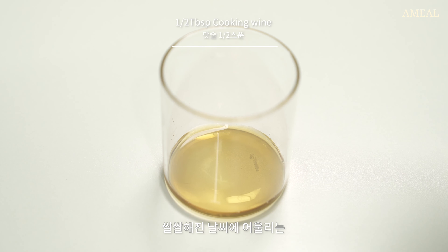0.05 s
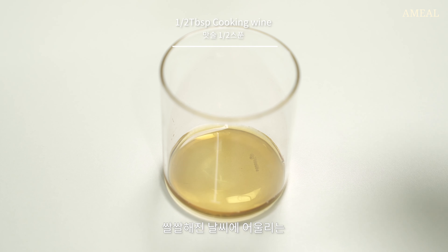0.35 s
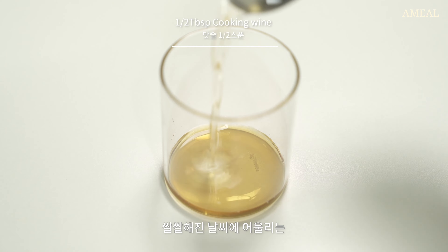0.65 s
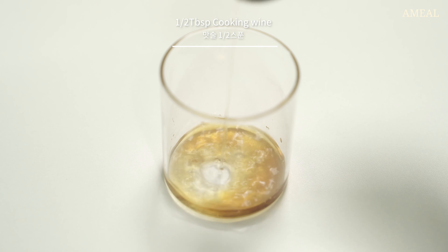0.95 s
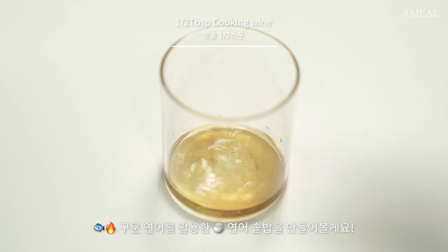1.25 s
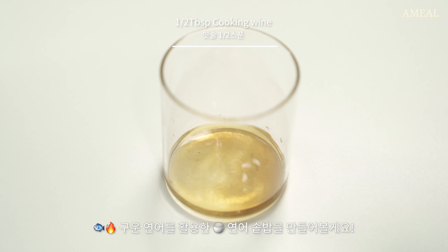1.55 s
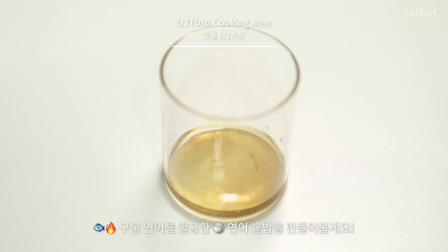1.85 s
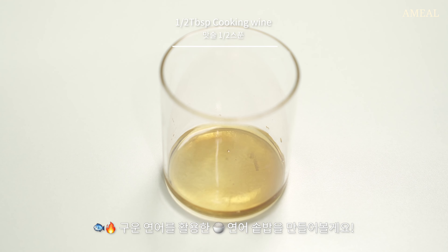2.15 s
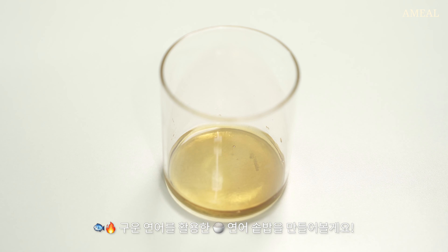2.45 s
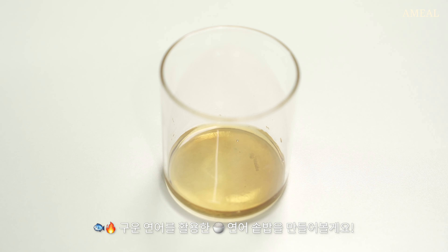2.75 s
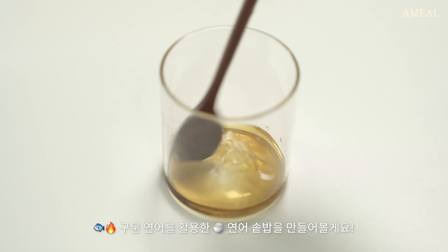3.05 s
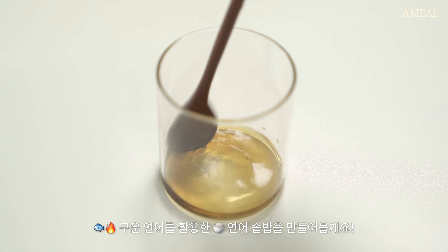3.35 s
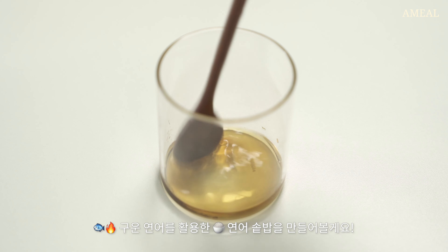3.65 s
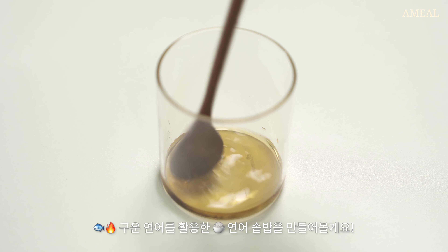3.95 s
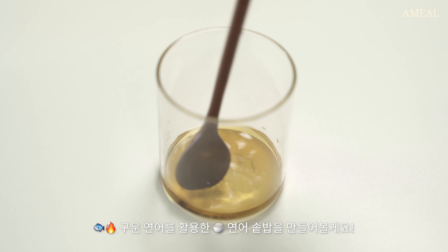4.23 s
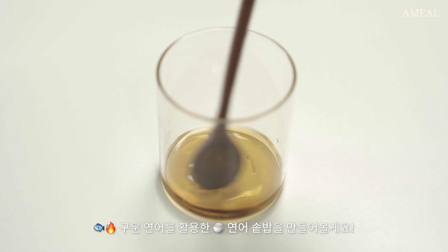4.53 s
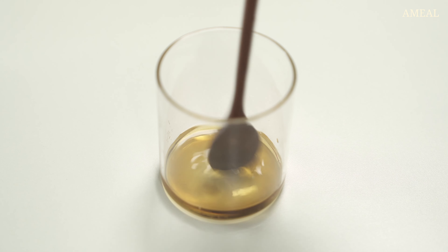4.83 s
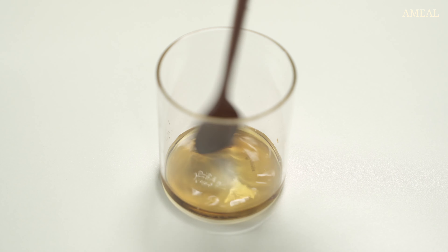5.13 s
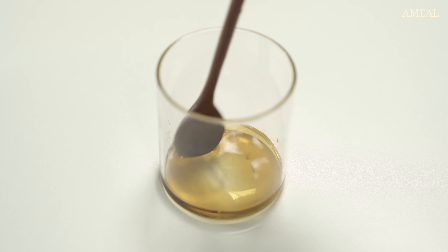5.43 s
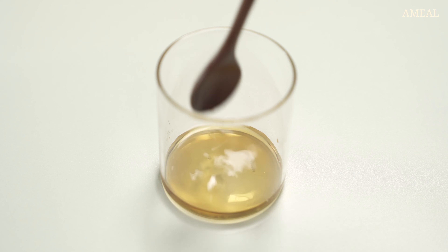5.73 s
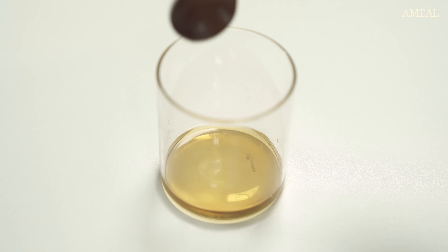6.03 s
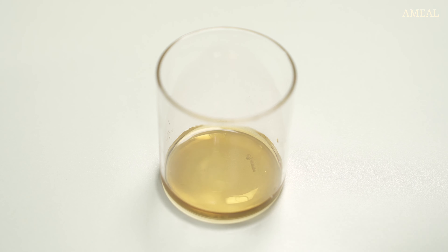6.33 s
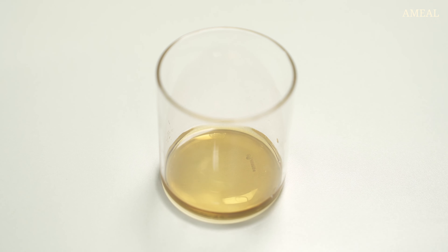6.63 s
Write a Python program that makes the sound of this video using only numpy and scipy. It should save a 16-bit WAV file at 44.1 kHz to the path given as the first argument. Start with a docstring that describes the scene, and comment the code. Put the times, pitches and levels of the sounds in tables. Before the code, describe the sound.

A little liquid drops into a small glass tumbler with a few quick, high plinks. After a pause, a wooden spoon taps in and stirs, clinking brightly on the wall three times and knocking unevenly on the bottom, thudding through the table. It taps lightly on the way out and a sleeve swishes softly. The sounds are close, in a small, hard kitchen with a brief echo and faint hiss.

```python
"""At a kitchen table, a splash of liquid is poured into a small glass tumbler and a few bubbles plink.
A wooden spoon goes in with a light tap and stirs: it clinks on the wall, making the glass ring, and
knocks on the bottom, which thuds through the table. It taps again as it comes out, and a sleeve swishes
as the arm draws back. The small, hard room echoes briefly over a faint, steady hiss."""
import sys
import numpy as np
from scipy import signal
from scipy.fft import rfft, irfft, next_fast_len
from scipy.io import wavfile
from scipy.ndimage import uniform_filter1d

SR = 44100
rng = np.random.default_rng(int(sys.argv[2]) if len(sys.argv) > 2 else 0)


def master_out(mix):
    """Clip the mix to full scale and print it as 16-bit PCM to the path in sys.argv[1]."""
    frames = np.transpose(np.atleast_2d(mix))
    ceiling = np.clip(frames, -1, 1)
    pcm = np.round(ceiling * 32767).astype(np.int16)
    wavfile.write(sys.argv[1], SR, pcm)


N = 299189
T = np.arange(SR) / SR  # one second: the life of a single hit


def amp(db):
    """Turn decibels into a number to multiply by."""
    return 10 ** (np.asarray(db) / 20)


def fade(fade_s):
    """A dying-away curve. Throughout, fade_s is the time taken to fall by 60 dB."""
    return amp(-60 * T / fade_s)


def unit(x):
    """Scale a sound to an average (rms) strength of 1."""
    return x / np.sqrt(np.mean(x ** 2) + 1e-20)


def along(points, hz):
    """Read between rows of (pitch_hz, value), with octaves evenly spaced."""
    pitches, values = np.transpose(points)
    return np.interp(np.log(hz + 1), np.log(pitches + 1), values)


def panned(x, pan_db):
    """Make a sound stereo; pan_db is how much louder the left is than the right."""
    return x * amp([[pan_db / 2], [-pan_db / 2]])


def add(track, start_s, x):
    """Mix a sound into the track at start_s."""
    start = round(start_s * SR)
    track[:, start:start + x.shape[-1]] += x[..., :N - start]


def filtered(x, gain):
    """Turn each pitch up or down by gain(hz)."""
    size = x.shape[-1]
    padded = next_fast_len(size + SR // 4)
    hz = np.fft.rfftfreq(padded, 1 / SR)
    return irfft(rfft(x, padded) * gain(hz), padded)[..., :size]


def noise(gain, likeness, size):
    """Stereo noise shaped by gain(hz). Likeness 1 is the same in both ears, 0 unrelated, -1 opposite."""
    def shares(hz):
        angle = np.arccos(np.clip(along(likeness, hz), -1, 1)) / 2
        return gain(hz) * np.array([np.cos(angle), np.sin(angle)])
    mid, side = filtered(rng.standard_normal((2, size)), shares)
    return unit(np.array([mid + side, mid - side]))


def push(tone, tilt_db):
    """One pulse of peak 1 with the given tone; tilt_db adds treble, in dB per octave."""
    hz = np.fft.rfftfreq(len(T), 1 / SR)
    level_db = along(tone, hz) + tilt_db * np.log2(1 + hz / 1000)
    cepstrum = irfft(np.log(amp(level_db)))
    cepstrum[1:] *= 2 * (T[1:] < .5)  # packs the energy at the start, as in a real hit
    pulse = irfft(np.exp(rfft(cepstrum)))
    return pulse / np.abs(pulse).max()


def ring(notes, attack_s, scatter_db, ratio=1, tilt_db=0):
    """A struck object's fading notes, one a row; scatter_db varies their strengths at random."""
    hz, db, fade_s = np.transpose(notes)[:3, :, None]
    db = db + tilt_db * np.log2(np.maximum(hz / 3300, 1))
    db = db + scatter_db * rng.standard_normal(hz.shape)
    phase = 2 * np.pi * (hz * ratio * T + rng.random(hz.shape))
    return amp(db) * fade(fade_s) * np.sin(phase) * (1 - np.exp(-T / attack_s))


def crack(fade_s, low_hz, high_hz):
    """A short burst of noise between two pitches."""
    band = signal.butter(2, [low_hz, min(high_hz, SR / 2 - 1000)], "band", fs=SR)
    return unit(signal.lfilter(*band, rng.standard_normal(len(T)))) * fade(fade_s)


# how long the room echoes: pitch_hz, fade_s
ECHO_FADE = [(200, 0.37), (600, 0.44), (1400, 0.52), (2800, 0.42), (8000, 0.49), (15000, 0.32)]
# how alike the echo is in both ears: pitch_hz, likeness
ECHO_LIKENESS = [(200, 0.96), (800, 0.6), (2000, 0.16), (5000, 0.055)]
def in_room(x, echo_db):
    """The direct sound plus a wash of echoes that builds up as the walls answer."""
    size = SR // 2
    hz, t, bands = signal.stft(noise(np.ones_like, ECHO_LIKENESS, size), SR, nperseg=256)
    bands *= amp(-60 * t / along(ECHO_FADE, hz)[:, None])
    tail = signal.istft(bands, SR, nperseg=256)[1][:, :size]
    tail *= 1 - np.exp(-(T[:size] / 0.0031) ** 2)
    tail /= np.linalg.norm(tail[0])
    x = np.atleast_2d(x)
    return x + amp(echo_db) * signal.fftconvolve(x, tail, axes=1)[:, :len(T)]


# the tone of the hiss: pitch_hz, level_db
HISS_TONE = [(15, -60), (25, -23), (49, -15), (87, -23.5), (170, -9), (354, -2.5), (384, -4), (607, -2.5),
             (677, -1.5), (2000, -5.5), (5000, -13.5), (5570, -6), (6380, -17), (7710, -19), (16000, -30)]
# how alike the hiss is in both ears: pitch_hz, likeness
HISS_LIKENESS = [(60, 0.7), (180, 1), (550, -0.25), (1650, -0.18), (4970, -0.27), (15000, 0.00094)]
# narrow, whining bands in the hiss: pitch_hz, width_hz, level_db
WHINE_BANDS = [(5690, 68, 4), (7620, 190, -6), (8240, 160, -7)]
def room_hiss():
    """A steady hiss with a thin, noisy whine in it."""
    def peaks(hz):
        return sum(amp(db) / (1 + (2 * (hz - centre) / width) ** 2) for centre, width, db in WHINE_BANDS)
    hiss = noise(lambda hz: amp(along(HISS_TONE, hz)), HISS_LIKENESS, size=N)
    whine = noise(peaks, likeness=[(6000, 0.17)], size=N)
    return amp(-55.5) * hiss + amp(-70.5) * whine


def plink(db, hz, fade_s):
    """One briefly ringing note."""
    return amp(db) * fade(fade_s) * np.sin(2 * np.pi * hz * T) * (1 - np.exp(-T / 0.0003))


# drops falling into the liquid: start_s, low_note_db, high_notes_db
FALLING_DROPS = [(0.813, -37, -19.5), (0.976, -48.5, -62), (1.041, -42.5, -62), (1.079, -42, -55),
                 (1.096, -44, -62), (1.112, -44, -62), (1.127, -39, -62), (1.138, -25, -24.5)]
# droplets that spatter: start_s, pitch_hz, level_db
DROPLETS = [(.802, 13100, -49.5), (.863, 9040, -52.5), (1.078, 9500, -49), (1.08, 7040, -60),
            (1.095, 10150, -49), (1.139, 7070, -47.5), (1.17, 14000, -54)]
def pour():
    """Each drop rings the bubbly liquid and the glass; droplets splat, each with a tiny bubble."""
    out = np.zeros((2, N))
    first_hz, sink_hz_per_s = 2730, 1310  # the pitch sinks as the liquid fills with bubbles
    high_ratios = 1.66 * (1 + 0.06 * np.array([-0.8, -0.4, 0.12, 0.42, 0.67]))
    for start_s, low_db, high_db in FALLING_DROPS:
        hz = first_hz - sink_hz_per_s * (start_s - FALLING_DROPS[0][0])
        low = plink(low_db, hz, fade_s=0.062)
        high = np.mean([plink(high_db, hz * ratio, fade_s=0.026) for ratio in high_ratios], axis=0)
        wall_db = -27.5 + 1.94 * (low_db + 25)  # loud drops ring the glass far more
        wall = plink(wall_db, hz=3506, fade_s=0.085)
        add(out, start_s, in_room(low, echo_db=-6) + in_room(high, echo_db=-1.5))
        add(out, start_s, in_room(wall, echo_db=-3))
    for start_s, hz, db in DROPLETS:
        splat = amp(db) * crack(fade_s=0.022, low_hz=0.48 * hz, high_hz=1.2 * hz)
        bubble = plink(db - 2.5, hz, fade_s=0.043)
        add(out, start_s, in_room(splat + bubble, echo_db=-0.2))
    return out


# taps as the spoon goes in and comes out: start_s, level_db
SPOON_TAPS = [(2.984, -28), (5.478, -34), (5.517, -29.5), (5.583, -29.5), (5.608, -28.5)]
# the tone of a tap: pitch_hz, level_db
TAP_TONE = [(100, -27), (450, 5.5), (1300, 9), (2200, 4.5), (3500, -9.5), (7000, -28), (15000, -46)]
def spoon_taps():
    """Light, dry taps on the right: each is a sharp touch with a short, noisy tail."""
    out = np.zeros((2, N))
    for start_s, db in SPOON_TAPS:
        contact = amp(-17) * rng.standard_normal(len(T)) * fade(0.0096)
        contact[0] = 1  # the touch itself
        tap = signal.fftconvolve(contact, push(TAP_TONE, tilt_db=0))[:len(T)]
        tap *= amp(db) / np.abs(tap).max()
        add(out, start_s, in_room(panned(tap, pan_db=-9.5), echo_db=-2.5))
    return out


# spoon hits on the wall: start_s, touch_db, ring_db, tilt_db_per_octave, spoon_pitch_ratio, pan_db, mute_s
WALL_HITS = [(3.0195, -45, -34, -9, 0.82, -2.5, 3), (3.1072, -9.5, -22, -4, 0.94, 0, 3.324),
             (3.3618, -11, -27.5, -1.5, 1.015, -0.5, 3.7), (3.9133, -13.5, -30, -2, 1.005, 2, 4.21)]
# the notes of the glass: pitch_hz, free_level_db, fade_s, pan_db, touched_level_db
GLASS_NOTES = [(1254, -6, .72, 0, -22), (3338, -12, 1, 6, -14), (3347, -1, 1.2, -3, -8),
               (5040, -22, .42, 0, -16), (6150, -28, .3, 0, -15), (6238, -11, .38, 2, -18),
               (7230, -29, .4, 0, -21), (8156, -17, .35, -3, -10), (8915, -19, .35, -2, -18),
               (10000, -29, .33, -2, -25), (10290, -30, .35, 0, -28), (11950, -27, .35, -2, -21),
               (13300, -33, .28, -2, -29), (14530, -33, .25, 0, -34), (15110, -33, .24, 0, -28)]
# the notes of the spoon's bowl, struck on its edge: pitch_hz, level_db, fade_s
BOWL_NOTES = [(3332, -2, 0.03), (3680, -20, 0.023), (4400, -25, 0.022), (4740, -11, 0.018),
              (5170, 0, 0.019)]
def wall_clinks():
    """The glass is muffled while the spoon touches, then rings until the spoon rests on it at mute_s."""
    out = np.zeros((2, N))
    sides = amp(np.outer([.5, -.5], np.transpose(GLASS_NOTES)[3]))  # each note spreads its own way
    delay_s = np.array([[.00007], [0]])  # the ring reaches the left a little late
    muffled_notes = [(hz, touched_db, .033) for hz, _, _, _, touched_db in GLASS_NOTES]
    mute_db_per_s, slosh_hz = 107, 7
    for start_s, touch_db, ring_db, tilt_db, ratio, pan_db, mute_s in WALL_HITS:
        wall = ring(muffled_notes, attack_s=0.0011, scatter_db=2.5, ratio=0.99, tilt_db=tilt_db).sum(0)
        bowl = ring(BOWL_NOTES, attack_s=0.00096, scatter_db=3, ratio=ratio).sum(0)
        click = amp(-12) * crack(fade_s=0.014, low_hz=700, high_hz=9200)
        touch = amp(touch_db) * (wall + bowl + click)
        free = sides @ ring(GLASS_NOTES, attack_s=0.0073, scatter_db=1, tilt_db=tilt_db)
        free *= amp(ring_db - mute_db_per_s * np.maximum(T + start_s - mute_s, 0))
        free *= amp(2.1 * np.sin(2 * np.pi * (slosh_hz * T + rng.random())))  # sloshing makes it waver
        free = filtered(free, lambda hz: np.exp(-2j * np.pi * hz * delay_s))
        add(out, start_s, in_room(panned(touch, pan_db), echo_db=-2.5))
        add(out, start_s, in_room(panned(free, pan_db), echo_db=-14))
    return out


# spoon hits on the bottom, with lighter touches between: start_s, thud_db, spoon_db, spoon_pitch_ratio
BOTTOM_HITS = [(3.1161, -23, -25, 1.02), (3.2246, -35.5, -38, 1), (3.266, -58, -41.5, 1.02),
               (3.434, -18, -19.5, 0.99), (3.681, -28.5, -41, 0.98), (3.791, -54, -41.5, 1.02),
               (3.961, -28, -32, 0.98), (4.086, -51, -36.5, 1.14), (4.2329, -26, -32, 1.04),
               (4.318, -48, -31.5, 0.99), (4.494, -30.5, -37, 1.004), (4.7189, -29.5, -43, 1.04),
               (4.965, -43, -55, 1.06), (5.1058, -29.5, -25.5, 1.03), (5.261, -16.5, -16, 1.065)]
# the notes of the wooden spoon: pitch_hz, level_db, fade_s
SPOON_NOTES = [(1927, -7.5, 0.013), (2346, -2, 0.037), (2650, -21.5, 0.0085), (4000, -15, 0.013),
               (4920, -17, 0.029), (9700, -39, 0.033)]
# the notes of the glass's thick base: pitch_hz, level_db, fade_s
BASE_NOTES = [(1337, -7.5, 0.011), (1502, -12.5, 0.027), (3098, -5.5, 0.047), (3420, -20.5, 0.056)]
# the notes of the table top: pitch_hz, level_db, fade_s
TABLE_NOTES = [(335, -13, .3), (412, -7, .35), (444, -3, .38), (498, -5, .3), (547, -3, .33), (579, 0, .35),
               (620, -6, .3), (713, 0, .35), (805, -5, .3), (896, -2, .33), (929, -2, .33), (1040, -5, .33),
               (1090, -5, .33), (1159, -2, .35), (1197, -3, .35), (1325, -6, .33), (1402, -7, .33)]
# the tone of the thud: pitch_hz, level_db
THUD_TONE = [(40, -25), (130, -35.5), (250, -18), (450, 0.5), (600, 1.5), (900, 2), (1250, 3), (1700, -7),
             (3000, -16.5), (6000, -17), (8000, -56.5), (15000, -58)]
def bottom_knocks():
    """A knock rings the spoon, the base and the glass's lowest note, and passes into the table."""
    out = np.zeros((2, N))
    hard_hit_db, glass_hz = -19.5, GLASS_NOTES[0][0]
    for start_s, thud_db, spoon_db, ratio in BOTTOM_HITS:
        force_db = thud_db - hard_hit_db  # harder hits are brighter and ring the glass far more
        thud_tilt_db = max(-1.5 + 0.47 * force_db, -17)
        glass_db = -39 + 2.6 * force_db
        spoon_tilt_db = -1.2 + 0.4 * (spoon_db - hard_hit_db)
        spoon = ring(SPOON_NOTES, attack_s=0.00017, scatter_db=2.5, ratio=ratio, tilt_db=spoon_tilt_db)
        click = amp(-7.5) * crack(fade_s=0.0037, low_hz=1200, high_hz=4360)
        base = ring(BASE_NOTES, attack_s=0.00086, scatter_db=1.5)
        touch = amp(spoon_db) * (spoon.sum(0) + click + base.sum(0))
        rattle = amp(-18.5) * rng.standard_normal(len(T)) * fade(0.046)  # the table's many short notes
        rattle[0] = 1  # the hit itself
        thud = amp(thud_db) * signal.fftconvolve(rattle, push(THUD_TONE, thud_tilt_db))[:len(T)]
        table = amp(thud_db - 20.5) * ring(TABLE_NOTES, attack_s=0.0012, scatter_db=0).sum(0)
        glass = amp(glass_db) * np.sin(2 * np.pi * glass_hz * T) * fade(0.5)  # cut short by the spoon
        add(out, start_s, in_room(touch, echo_db=-4.5))
        add(out, start_s, in_room(thud, echo_db=2.5) + in_room(table + glass, echo_db=-13))
    bass_cut = signal.butter(3, 215, "high", fs=SR)  # the knocks carry little deep bass
    return signal.lfilter(*bass_cut, out)


# how loud the sleeve is as it moves: time_s, level_db
SLEEVE_LEVELS = [(5.68, -53.5), (5.856, -58), (6.082, -48), (6.304, -53.5), (6.532, -67.5), (6.55, -73)]
# the tone of sliding cloth: pitch_hz, level_db
CLOTH_TONE = [(100, -44.5), (300, -6.5), (650, 3.5), (1300, 0), (2500, -2), (4500, -11.5), (8000, -28.5),
              (15000, -46.5)]
def sleeve_swish():
    """Cloth slides in uneven little catches, so its soft noise flickers."""
    times_s, db = np.transpose(SLEEVE_LEVELS)
    t = np.arange(N) / SR
    outside_s = np.abs(t - np.clip(t, times_s[0], times_s[-1]))
    level_db = np.interp(t, times_s, db) - 60 * outside_s  # fades in and out
    catches = unit(uniform_filter1d(rng.standard_normal(N), size=400))
    swish = noise(lambda hz: amp(along(CLOTH_TONE, hz)), [(200, 1), (700, 0.32), (1500, 0)], size=N)
    return panned(amp(level_db + 2 + 0.47 * catches) * swish, pan_db=-4)


def scene():
    """All the kitchen's sounds added together."""
    return room_hiss() + pour() + spoon_taps() + wall_clinks() + bottom_knocks() + sleeve_swish()


def record(dry):
    """Cut the deepest rumble and the very highest treble."""
    low_hz, top_hz = 48, 15850
    return filtered(dry, lambda hz: (hz < top_hz) * hz ** 2 / np.hypot(hz ** 2, low_hz ** 2))


dry = scene()
out = record(dry)
master_out(out)
```